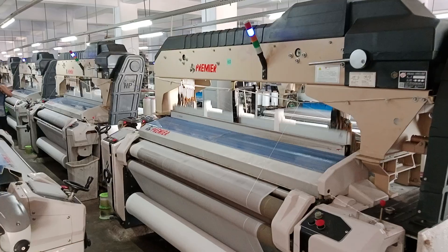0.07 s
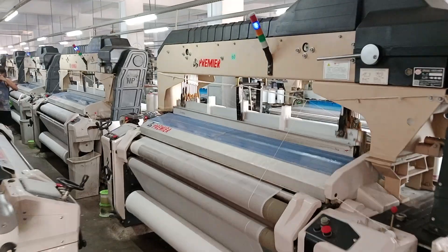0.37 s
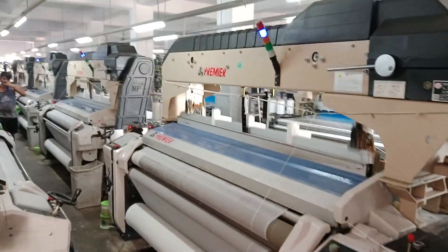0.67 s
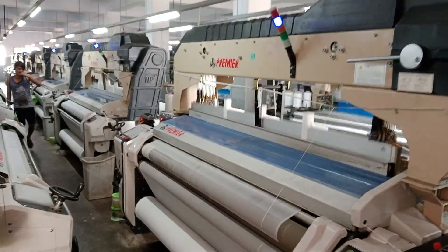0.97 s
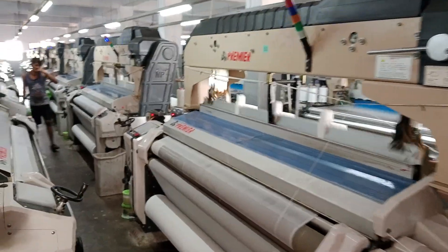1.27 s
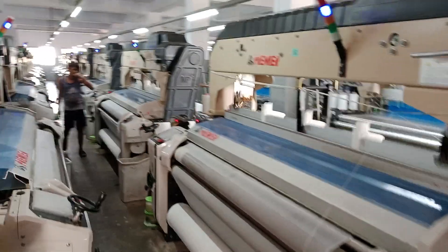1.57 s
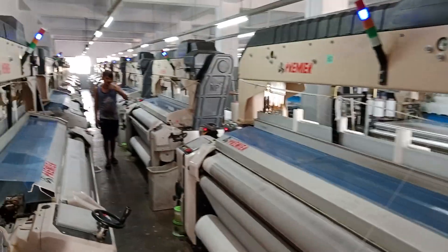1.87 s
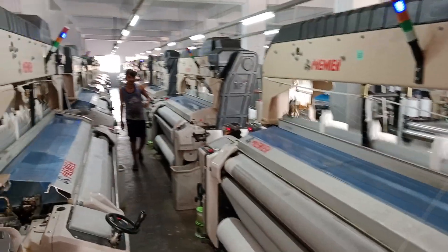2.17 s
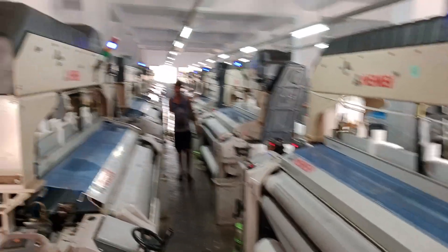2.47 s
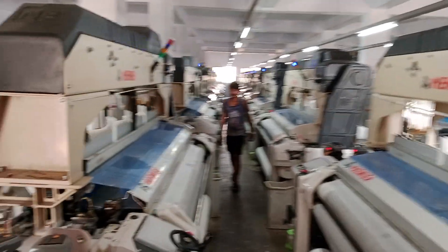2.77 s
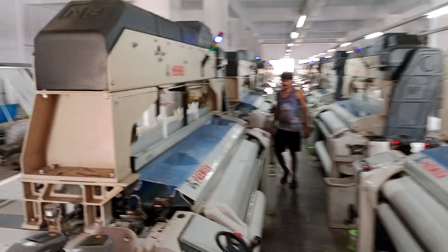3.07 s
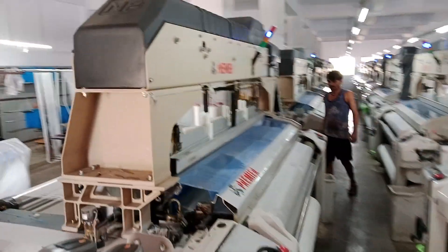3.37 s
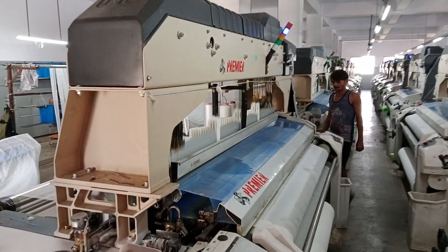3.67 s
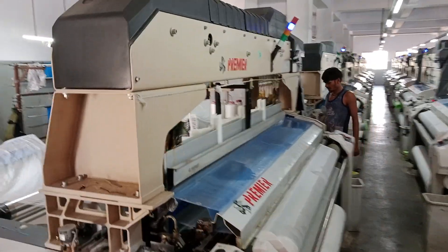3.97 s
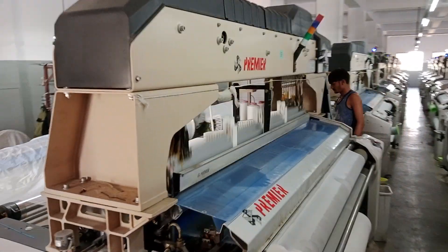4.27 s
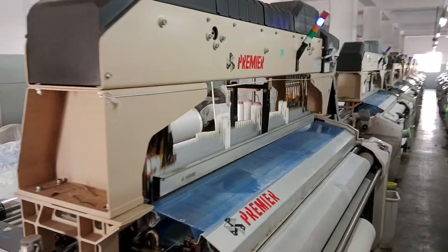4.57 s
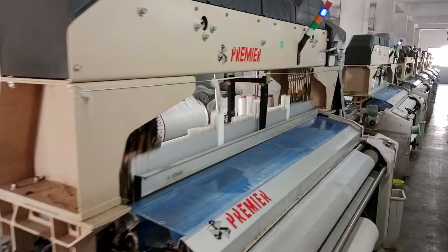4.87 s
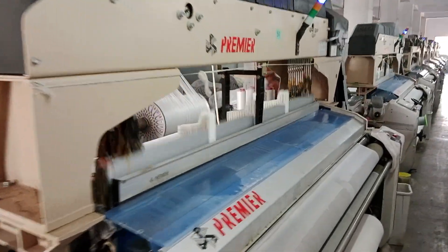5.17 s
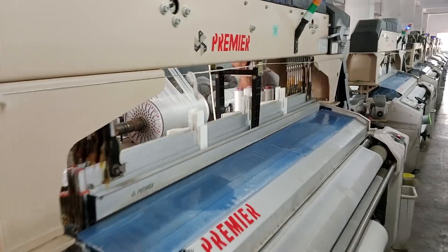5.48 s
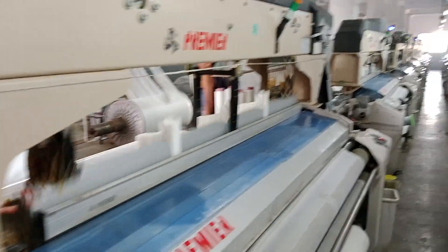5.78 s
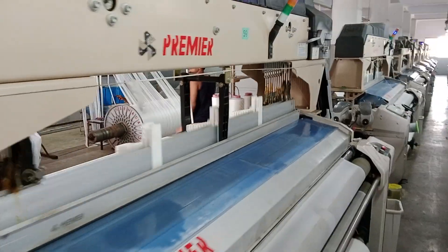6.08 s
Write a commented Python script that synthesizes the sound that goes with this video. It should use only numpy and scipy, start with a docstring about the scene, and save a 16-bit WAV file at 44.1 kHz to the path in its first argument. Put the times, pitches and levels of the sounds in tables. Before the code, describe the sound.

A steady, reverberant roar of massed looms fills a weaving hall, over machine hum and faint floor rumble. Close to the moving microphone, one loom puffs air and clacks in a fast, even rhythm, then falls back into the din. Machine frames throb and ring along the aisle. Another loom approaches, its clatter growing sharper, with several harder clacks and a brief, thin two-part squeak.

```python
"""A reverberant roar of looms, all running at nearly one speed, fills a weaving hall.
One microphone walks the aisle, away from one loom and up to another, amid hiss, hum and floor rumble.
On each pick (one shaft turn, one weft thread) the nearest looms add a puff of air, sharp clacks of
cutter and shedding gear, a ring of the heald frames and a throb of the machine frame.
Threads rasp through their guides; later come a few harder clacks and one thin, two-part squeak."""
import sys
import numpy as np
from scipy import signal
from scipy.fft import rfft, irfft, next_fast_len
from scipy.io import wavfile
from scipy.ndimage import map_coordinates

SR = 44100
rng = np.random.default_rng(int(sys.argv[2]) if len(sys.argv) > 2 else 0)


def master_out(mix):
    """Clip the mix to full scale and print it as 16-bit PCM to the path in sys.argv[1]."""
    frames = np.transpose(np.atleast_2d(mix))
    ceiling = np.clip(frames, -1, 1)
    pcm = np.round(ceiling * 32767).astype(np.int16)
    wavfile.write(sys.argv[1], SR, pcm)


N = 269892
PICKS_PER_S, HALL_T60_S = 11.436, 1.3


def from_db(db):
    """Decibels to gain."""
    return 10 ** (np.asarray(db) / 20)


def rms_one(x):
    """Scale to unit rms."""
    return x / np.sqrt(np.mean(x ** 2) + 1e-20)


def seconds():
    """The time of every sample."""
    return np.arange(N) / SR


def drift(rate_hz):
    """A smooth random wander of rms 1."""
    knots = rng.standard_normal(int(N / SR * rate_hz) + 4)
    return rms_one(map_coordinates(knots, [seconds() * rate_hz + 1], order=3, mode="nearest"))


def colour(x, spectrum):
    """Give a steady sound a spectrum; rms 1."""
    hz, db = np.transpose(spectrum)
    size = next_fast_len(N)
    bins_hz = np.maximum(np.arange(size // 2 + 1) * SR / size, 1)
    gain = from_db(np.interp(np.log(bins_hz), np.log(hz), db))
    bass_rolloff = np.minimum(bins_hz / hz[0], 1) ** 2
    return rms_one(irfft(rfft(x, size) * gain * bass_rolloff, size)[:N])


def resonate(x, modes):
    """Parallel resonances of alternating sign; white noise keeps about its rms."""
    out, power = 0, 0
    for k, (hz, width_hz, db) in enumerate(modes):
        radius = np.exp(-np.pi * width_hz / SR)
        scale = (1 - radius ** 2) / 2
        poles = [1, -2 * radius * np.cos(2 * np.pi * hz / SR), radius ** 2]
        out = out + (-1) ** k * from_db(db) * signal.lfilter([scale, 0, -scale], poles, x + 1e-18)
        power += scale * from_db(db) ** 2
    return out / np.sqrt(power)


def each_pick(turn, jitter_s, spread_db):
    """One impulse per revolution at a given shaft angle, a little uneven in time and force."""
    picks = np.arange(int(N / SR * PICKS_PER_S) + 1)
    timing, force = rng.standard_normal((len(picks), 2)).T
    at = np.round(((picks + turn) / PICKS_PER_S + jitter_s * timing) * SR).astype(int)
    inside = (at >= 0) & (at < N)
    return np.bincount(at[inside], from_db(spread_db * force[inside]), N)


def rattle(blows, decay_s):
    """Each blow sets off a burst of tiny contacts that dies away."""
    envelope = signal.lfilter([1], [1, -np.exp(-1 / (decay_s * SR))], blows + 1e-18)
    return envelope * rng.standard_normal(N)


def echo_tail(t60_s):
    """Dense reflections that die away by 60 dB."""
    age_s = np.arange(int(t60_s * SR)) / SR
    return rng.standard_normal(len(age_s)) * from_db(-60 * age_s / t60_s)


def among_machines(x, scatter_db, t60_s):
    """The neighbouring machines scatter a near sound and soften its edges."""
    echoes = echo_tail(t60_s)
    scattered = signal.fftconvolve(x, echoes / np.linalg.norm(echoes))[:N]
    return (x + from_db(scatter_db) * scattered) / np.sqrt(1 + from_db(scatter_db) ** 2)


def passing(places):
    """Sources fall as one over distance, 3 dB down at reach_s from their closest; their powers add."""
    return np.sqrt(sum(from_db(db) ** 2 / (1 + ((seconds() - closest_s) / reach_s) ** 2)
                       for closest_s, reach_s, db in places))


# The loom the microphone leaves and the one it comes up to: closest_s, reach_s
NEAR_LOOMS = [(0.55, 1.08), (6.05, 0.44)]

def at_looms(first_db, second_db):
    """Gain of a part that both near looms have, from its level at the closest point of each."""
    return passing([(*place, db) for place, db in zip(NEAR_LOOMS, (first_db, second_db))])


# The floor underfoot: frequency_hz, relative_db
FLOOR_SPECTRUM = [(15, 0), (45, 5), (70, -6), (110, 5), (300, -34)]

def floor_rumble():
    """The floor rumbles steadily under the machines."""
    return colour(rng.standard_normal(N), FLOOR_SPECTRUM)


def loom_row(jitter_s, speed_spread, force_spread_db, looms=5, contacts=14):
    """Distant looms each repeat their own round of contacts; the hall smears them into a roar."""
    lead_in = int(HALL_T60_S * SR)
    length = N + lead_in
    turns = np.arange(int(length / SR * PICKS_PER_S) + 4)[:, None]
    blows = np.zeros(length)
    for _ in range(looms):
        speed = PICKS_PER_S * (1 + speed_spread * rng.standard_normal())
        when_s = (turns + rng.random(contacts) - 1) / speed
        when_s += jitter_s * rng.standard_normal(when_s.shape)
        force = rng.standard_normal(contacts)
        force = force * from_db(force_spread_db * rng.standard_normal(when_s.shape))
        at = (when_s * SR).astype(int)
        inside = (at >= 0) & (at < length)
        blows += np.bincount(at[inside], force[inside], length)
    return rms_one(signal.fftconvolve(blows, echo_tail(HALL_T60_S))[lead_in:length])


# The massed looms, heard from the aisle: frequency_hz, relative_db
ROAR_SPECTRUM = [(29, -54), (50, -22.5), (136, -7.5), (311, -4), (404, -3), (444, -5.5), (497, -6),
                 (767, -6.5), (842, -5.5), (1300, -6.5), (2280, -12.5), (3090, -12.5), (3870, -21.5),
                 (4170, -40), (4500, -51), (5850, -67.5), (9900, -120)]

def hall_roar(flutter_db, far_db, rows=6):
    """Rows of looms all round merge into a fluttering roar; the farthest blur into plain noise."""
    clatter = sum(loom_row(jitter_s=.0003, speed_spread=.008, force_spread_db=2.5) for _ in range(rows))
    far = from_db(far_db) * rng.standard_normal(N)
    return colour((rms_one(clatter) + far) * from_db(flutter_db * drift(130)), ROAR_SPECTRUM)


# Air and threads across the hall: frequency_hz, relative_db
HISS_SPECTRUM = [(3060, -46), (5200, -13), (6840, 1), (7230, 3), (7790, 2.5), (9170, -9), (9950, -4.5),
                 (11400, -11), (12900, -4.5), (14200, -11), (15200, -6.5), (15800, -13.5)]

def hall_hiss(grain_db):
    """Air and thread noise of all the looms, with a fine grain."""
    return colour(rng.standard_normal(N) * from_db(grain_db * drift(350)), HISS_SPECTRUM)


# The roar at the microphone along the walk: time_s, level_db
ROAR_ALONG_AISLE = [(0.35, -16.5), (0.88, -15.5), (1.06, -17.5), (1.88, -18.5), (2.07, -18), (6.12, -17)]

def distant_looms():
    """The roar rises and falls a little along the aisle, and the hiss follows most of its swing."""
    roar_db = np.interp(seconds(), *np.transpose(ROAR_ALONG_AISLE))
    hiss_db = -34.5 + 0.8 * (roar_db - roar_db.mean())
    roar = from_db(roar_db) * hall_roar(flutter_db=0.64, far_db=-8)
    return roar + from_db(hiss_db) * hall_hiss(grain_db=0.85)


# The drives, heard all along the aisle: multiple_of_pick_rate, level_db
DRIVE_ORDERS = [(5, -75.5), (10, -48.5), (13, -41.5), (17, -49), (18, -47), (28, -48), (36, -38.5),
                (47, -41)]

def drive_hum(waver_db):
    """The drives hum at multiples of the shaft speed, each wavering in level and phase."""
    shaft_angle = 2 * np.pi * PICKS_PER_S * seconds()
    return sum(np.sqrt(2) * from_db(db + waver_db * drift(2.0)) * np.sin(order * shaft_angle + drift(1.17))
               for order, db in DRIVE_ORDERS)


# Resonances of a machine frame beside the aisle: pitch_hz, width_hz, relative_db
FRAME_MODES = [(373.6, 21.4, -4.5), (389.4, 9.6, -5.5), (412.2, 7.2, 1.5)]
# Where the microphone passes such frames: closest_s, reach_s, level_db
FRAME_PLACES = [(0.4, 0.15, -34.5), (2.8, 1.17, -27.5)]

def frame_throb():
    """The machine frame booms once per pick and its panels rattle after it."""
    blows = each_pick(turn=.73, jitter_s=.0001, spread_db=3.8)
    boom = rms_one(resonate(blows, FRAME_MODES))
    panels = rms_one(resonate(rattle(blows, decay_s=0.044), [(300, 36, -15), (394, 23, 0)]))
    return passing(FRAME_PLACES) * rms_one(boom + 0.54 * panels)


# Resonances of the heald frames and of the reed: pitch_hz, width_hz, relative_db
HEALD_MODES = [(845, 27.8, -1), (1460, 96, -3.5), (2524, 21, -1), (3104, 28, 4)]
REED_MODES = [(1475.9, 390, -8), (3030, 760, -1)]
# Where the microphone passes them: closest_s, reach_s, gain_db
HEALD_PLACES = [(0.35, 0.4, -33.5), (4.4, 1.2964, -27.5)]

def healds_and_reed():
    """The beat-up shakes the heald frames, which ring on, and the reed, which clatters briefly."""
    swell = 1 + .5 * np.cos(2 * np.pi * (PICKS_PER_S * seconds() - .08))
    healds = resonate(rms_one(swell * rng.standard_normal(N)), HEALD_MODES)
    beats = each_pick(turn=0.98, jitter_s=.002, spread_db=2.5)
    clatter = rms_one(rattle(beats, decay_s=0.013))
    reed = resonate(resonate(clatter, REED_MODES), REED_MODES)
    reed = rms_one(among_machines(reed, scatter_db=3, t60_s=0.035))
    return passing(HEALD_PLACES) * (from_db(-1.5) * healds + from_db(-9) * reed)


def casing_shadow(deepest_s, half_length_s, loss_db):
    """The second loom's end casing screens its guides from the microphone: a broad, soft-edged dip."""
    return from_db(-loss_db * np.exp(-((seconds() - deepest_s) / half_length_s) ** 4))


# Resonances of the thread guides on the near looms: pitch_hz, width_hz, relative_db
GUIDE_MODES = [(4020, 400, 2.8), (8600, 1100, -1.5), (9980, 950, 1)]

def thread_rasp(grain_db):
    """Threads rub through the guides of a loom close by."""
    rubbing = rng.standard_normal(N) * from_db(grain_db * drift(200))
    rasp = rms_one(resonate(resonate(rubbing, GUIDE_MODES), GUIDE_MODES))
    shadow = casing_shadow(deepest_s=4.0, half_length_s=1.05, loss_db=18)
    return at_looms(first_db=-37.5, second_db=-38.5) * shadow * rasp


# Two pushes of one squeak, on the way up to the second loom: start_s, length_s, peak_db
SQUEAK_PUSHES = [(5.37, .135, -34.5), (5.525, .1, -43)]

def squeak(pitch_hz):
    """A dry contact sings briefly; each push swells and dies away."""
    level = sum(from_db(db) * np.sin(np.pi * np.clip((seconds() - start_s) / length_s, 0, 1))
                for start_s, length_s, db in SQUEAK_PUSHES)
    hz = pitch_hz + 18 * drift(120)
    return level * np.sin(2 * np.pi * np.cumsum(hz) / SR)


# Resonances of the weft cutter, close up: pitch_hz, width_hz, relative_db
CUTTER_MODES = [(7200, 1300, -1), (9900, 700, 0), (12900, 1400, -7), (15200, 900, -9)]

def weft_cutter():
    """The weft cutter snaps and rebounds."""
    snap = each_pick(turn=.443, jitter_s=.0003, spread_db=1.6)
    rebound = each_pick(turn=.535, jitter_s=.001, spread_db=1.5)
    contacts = rattle(snap + .35 * rebound, decay_s=0.0013)
    return at_looms(first_db=-30, second_db=-25.5) * resonate(contacts, CUTTER_MODES)


# The ring of a clack, close up: pitch_hz, width_hz, relative_db
CLACK_MODES = [(3600, 700, -1), (7400, 1300, 0), (9900, 700, -6), (13000, 2500, -15)]

def shedding_gear():
    """The shedding gear clacks twice as it reverses."""
    clack = each_pick(turn=.742, jitter_s=.0005, spread_db=1.6)
    back = each_pick(turn=.8, jitter_s=.001, spread_db=2.0)
    contacts = rattle(clack + 0.3 * back, decay_s=0.0032)
    return at_looms(first_db=-33, second_db=-30) * resonate(contacts, CLACK_MODES)


# Occasional harder clacks as the second loom draws near: start_s, strength_db
HARD_CLACKS = [(3.8682, -37), (4.5234, -30), (5.2235, -23), (5.7485, -22), (5.9229, -27), (5.9843, -27)]

def hard_clacks():
    """Now and then the loom's mechanisms give a single harder clack."""
    start_s, strength_db = np.transpose(HARD_CLACKS)
    blows = np.bincount((start_s * SR).astype(int), from_db(strength_db), N)
    return resonate(rattle(blows, decay_s=0.0012), CLACK_MODES)


def valve_puffs(width_turns, wander_turns, grain_db):
    """The air valve opens once on every pick, never quite the same twice."""
    peak_turn = .985 + .057 * np.minimum(seconds() / 2.7, 1)   # arrives later as the first loom recedes
    turns = seconds() * PICKS_PER_S - peak_turn + wander_turns * drift(14)
    from_peak = (turns + .5) % 1 - .5
    unevenness = from_db(grain_db * drift(250) + drift(9.9))
    return np.exp(-.5 * (from_peak / width_turns) ** 2) * unevenness


# The air jet of a near loom: frequency_hz, relative_db
JET_SPECTRUM = [(3500, -6), (5500, -10), (7300, 0), (8800, -2), (9400, -3), (10000, 1), (11400, -10),
                (13000, -3), (14200, -8), (15000, -5), (15450, 2), (15900, -7)]

def air_jet(nozzle_hz, nozzle_width_hz):
    """A puff of air carries the weft across and makes the nozzle ring."""
    air = rng.standard_normal(N)
    puffs = valve_puffs(width_turns=.053, wander_turns=.008, grain_db=0.2)
    jet = at_looms(first_db=-27, second_db=-32) * puffs * colour(air, JET_SPECTRUM)
    ring = resonate(puffs * air, [(nozzle_hz, nozzle_width_hz, 0)])
    return jet + passing([(0.45, 1.4, -46.5)]) * ring   # the nozzle is passed early in the walk


def scene():
    """The hall all round, the nearest looms close to the microphone; mono."""
    hall = distant_looms() + from_db(-55) * floor_rumble()
    clacks = weft_cutter() + shedding_gear() + hard_clacks()
    body = healds_and_reed() + frame_throb() + drive_hum(waver_db=0.8)
    weft = air_jet(nozzle_hz=15480, nozzle_width_hz=300) + thread_rasp(grain_db=1.3)
    near = among_machines(clacks + weft, scatter_db=-7, t60_s=.1)
    return (hall + near + body + squeak(pitch_hz=12260))[None]


def record(dry):
    """The microphone thins the deep bass and has one notch; the sound fades in and the top is cut."""
    low_cut_hz, top_cut_hz, notch_hz, half_width_hz = 54.98, 15800, 4820, 383
    fade_start_s, fade_time_constant_s = 0.16, 0.056
    low_cut = signal.butter(3, low_cut_hz, "highpass", fs=SR, output="sos")
    notch_edges_hz = [notch_hz - half_width_hz, notch_hz + half_width_hz]
    notch = signal.butter(2, notch_edges_hz, "bandstop", fs=SR, output="sos")
    top_cut = signal.ellip(12, .1, 90, top_cut_hz, fs=SR, output="sos")
    fade = 1 - np.exp(-np.maximum(seconds() - fade_start_s, 0) / fade_time_constant_s)
    picked_up = signal.sosfilt(notch, signal.sosfilt(low_cut, dry))
    return signal.sosfilt(top_cut, picked_up * fade)


dry = scene()
out = record(dry)
master_out(out)
```